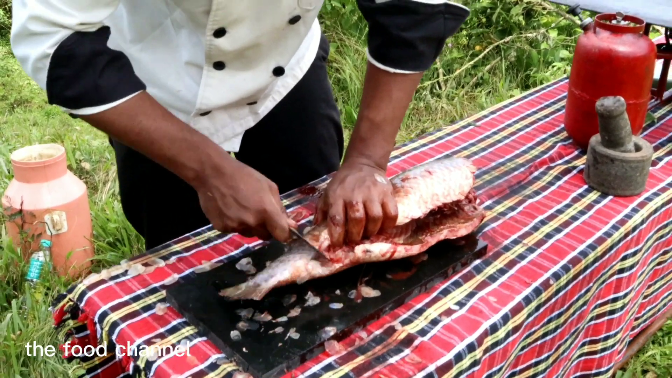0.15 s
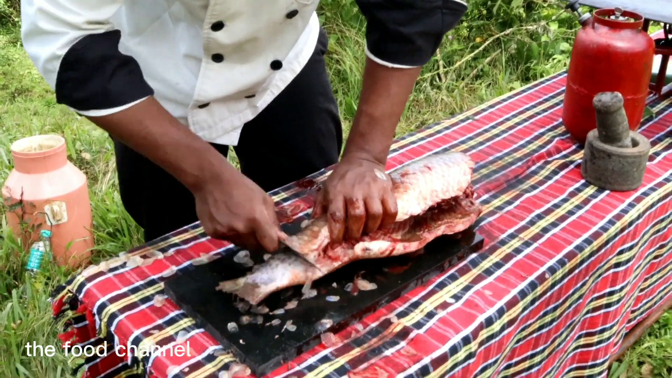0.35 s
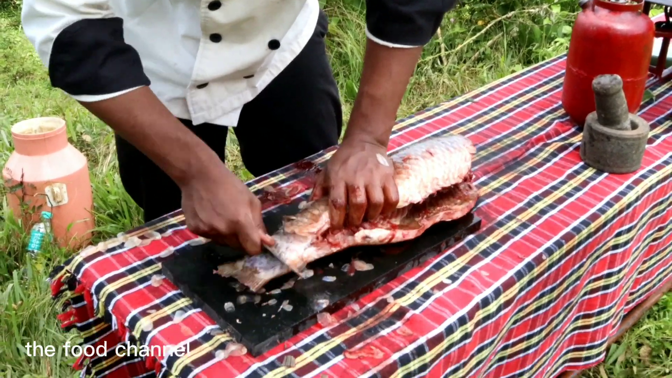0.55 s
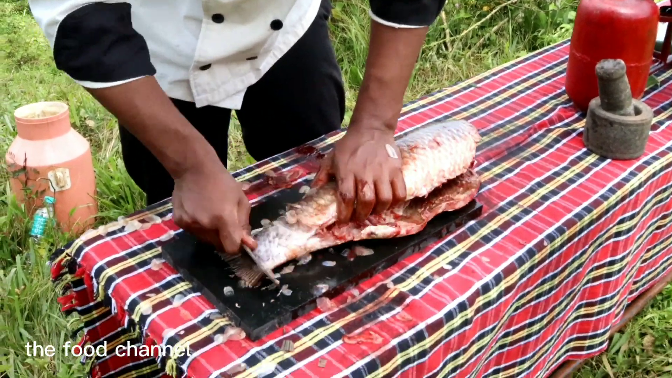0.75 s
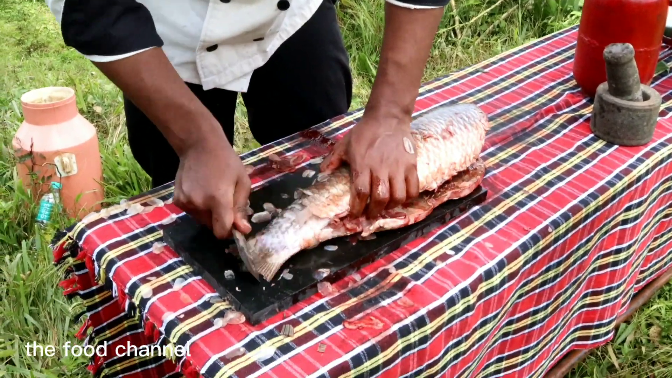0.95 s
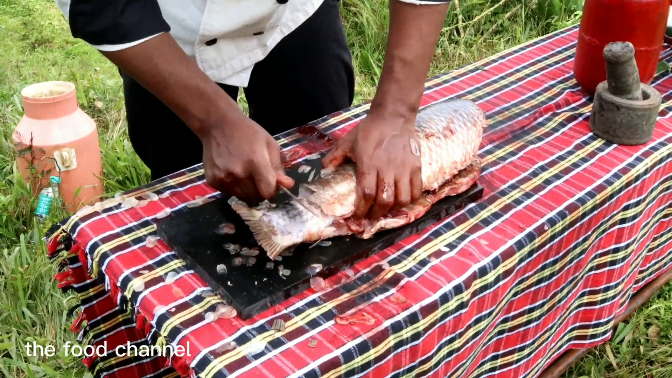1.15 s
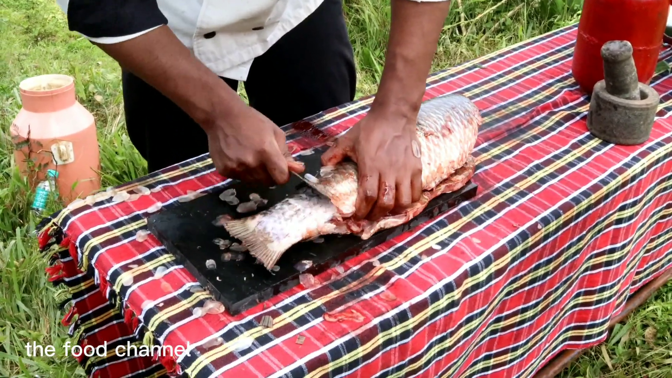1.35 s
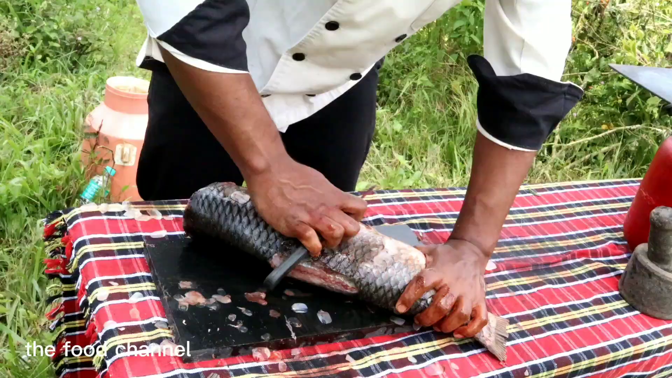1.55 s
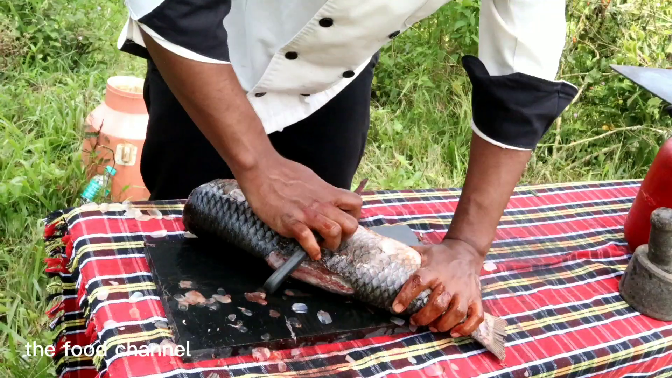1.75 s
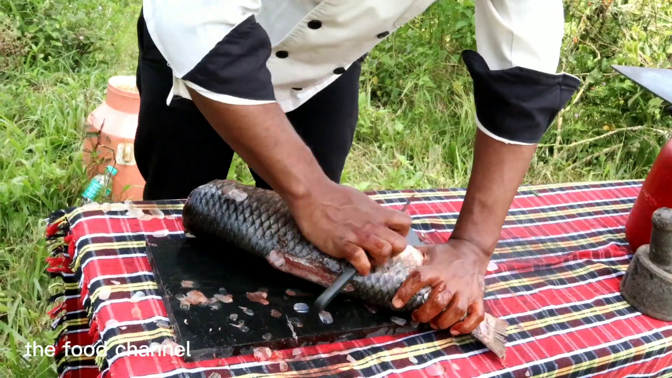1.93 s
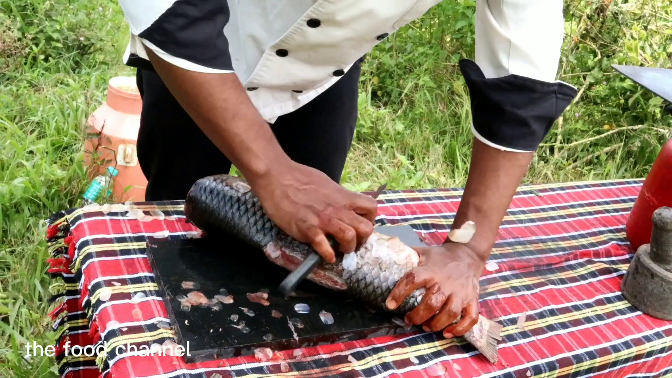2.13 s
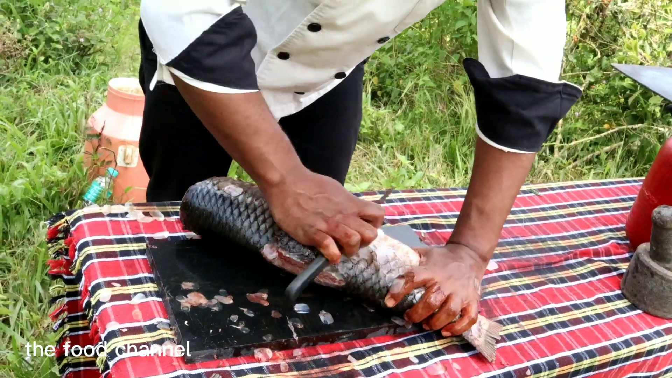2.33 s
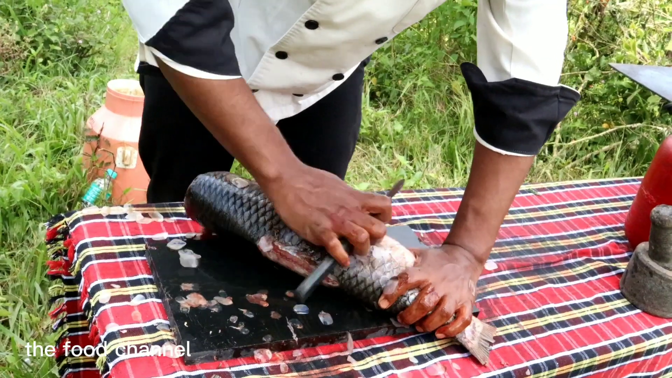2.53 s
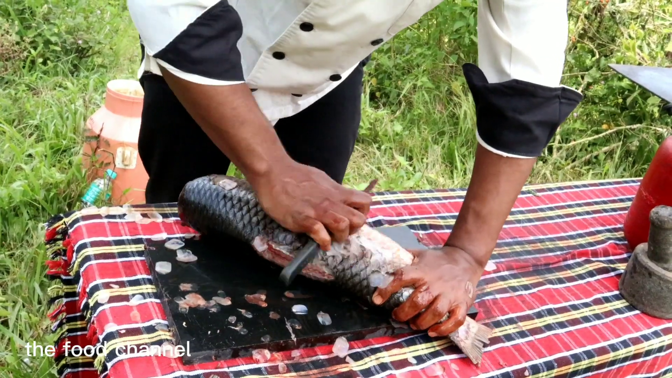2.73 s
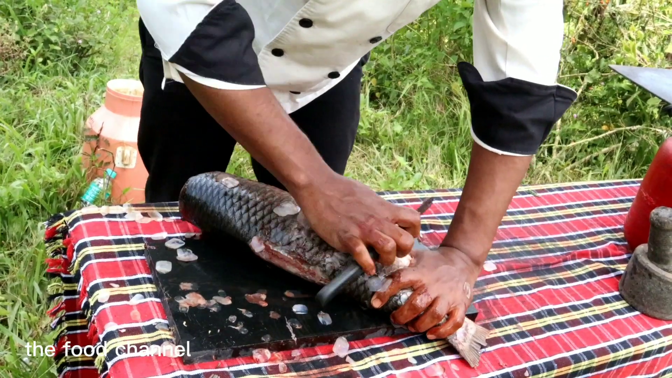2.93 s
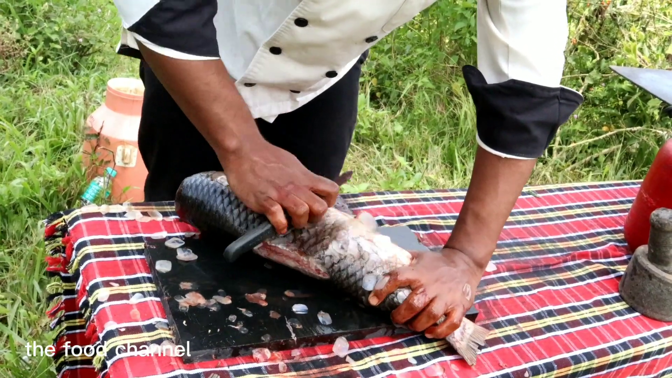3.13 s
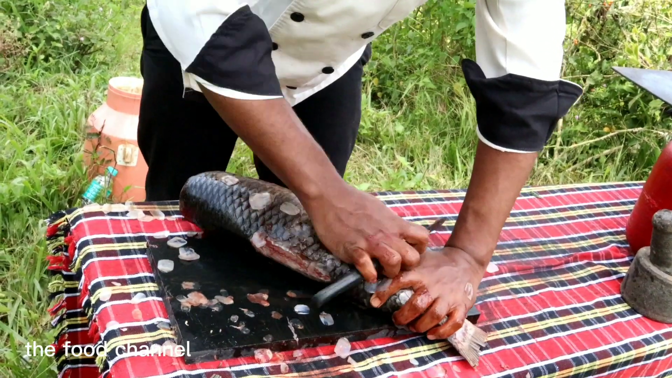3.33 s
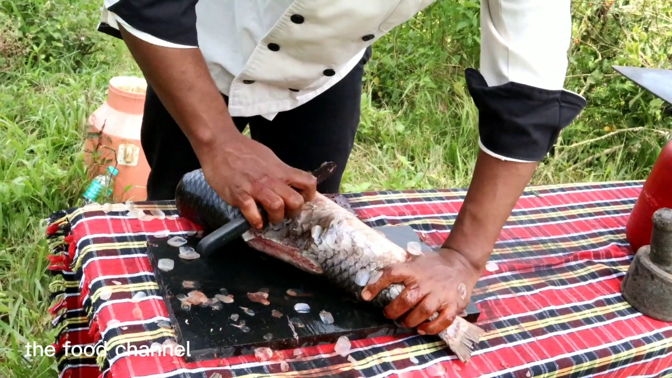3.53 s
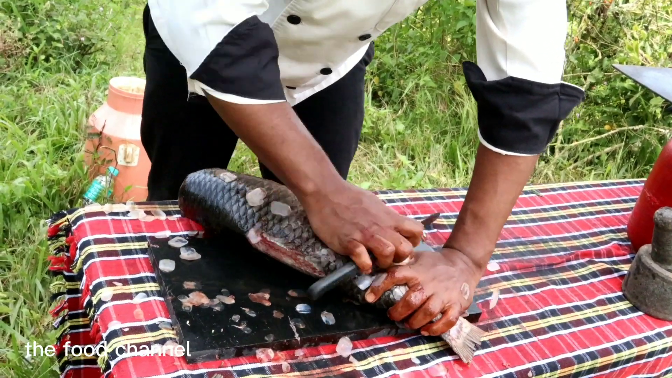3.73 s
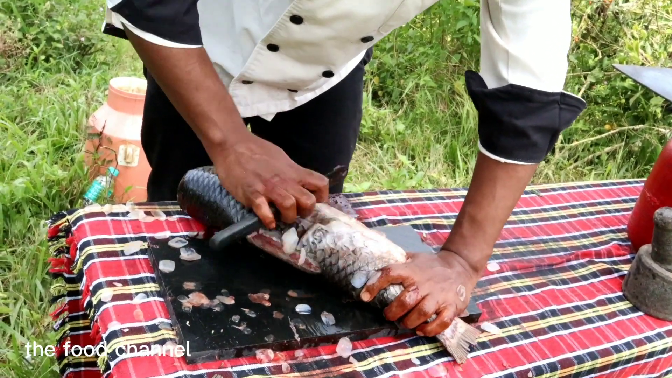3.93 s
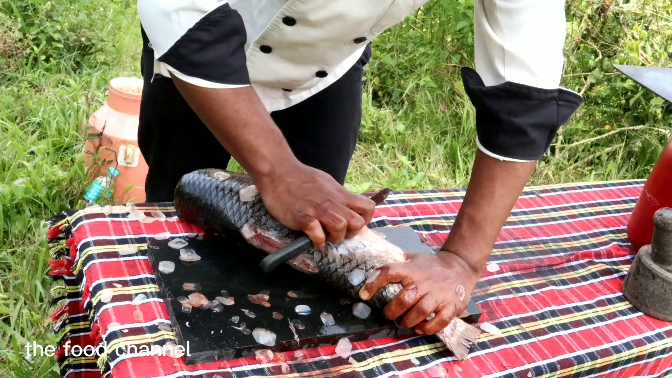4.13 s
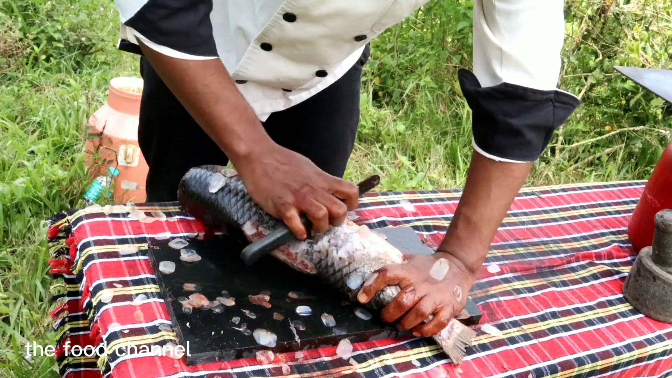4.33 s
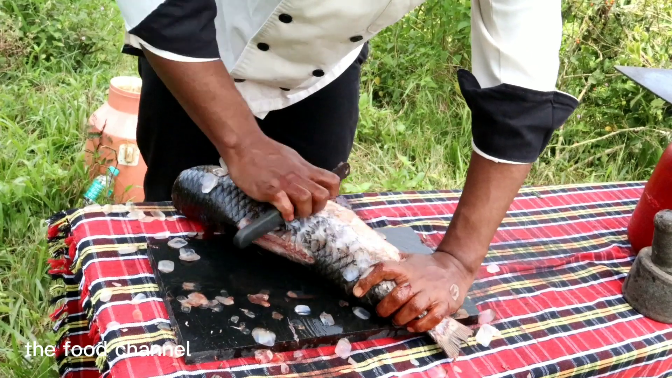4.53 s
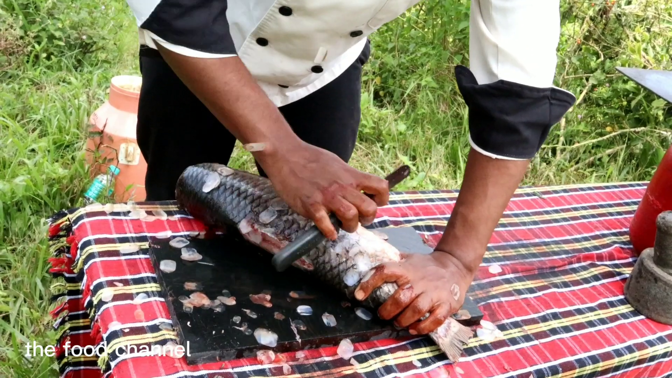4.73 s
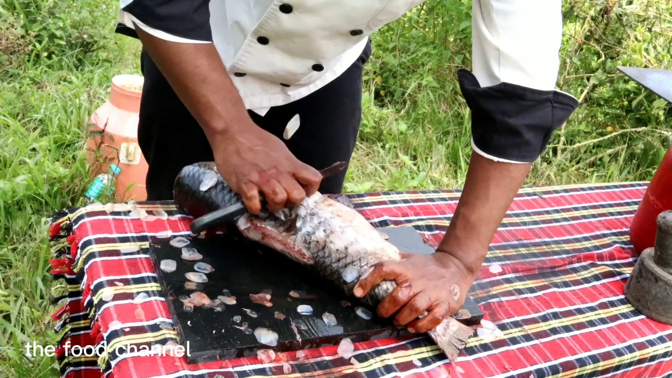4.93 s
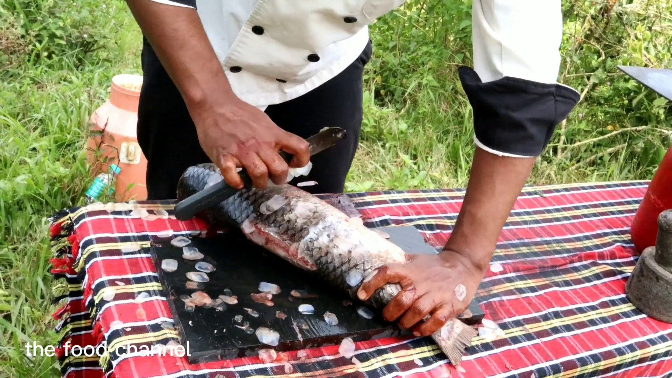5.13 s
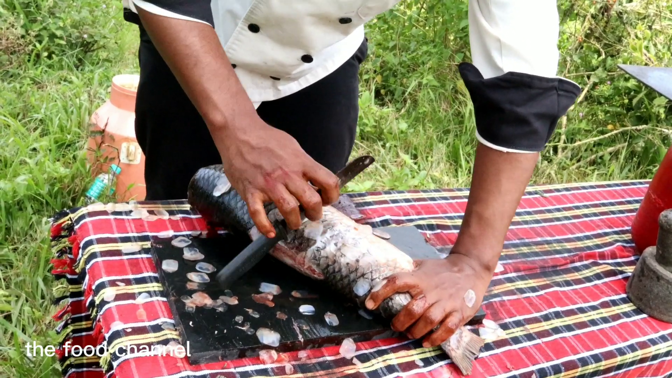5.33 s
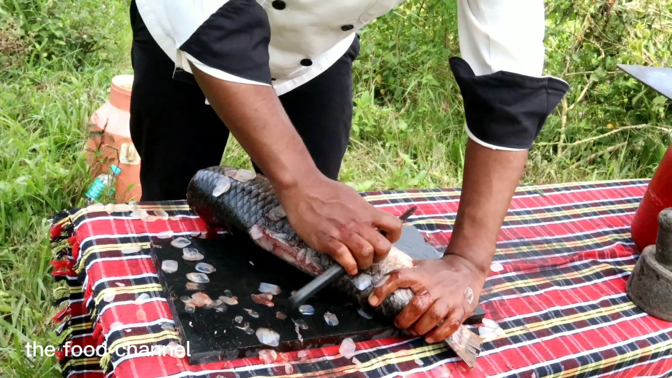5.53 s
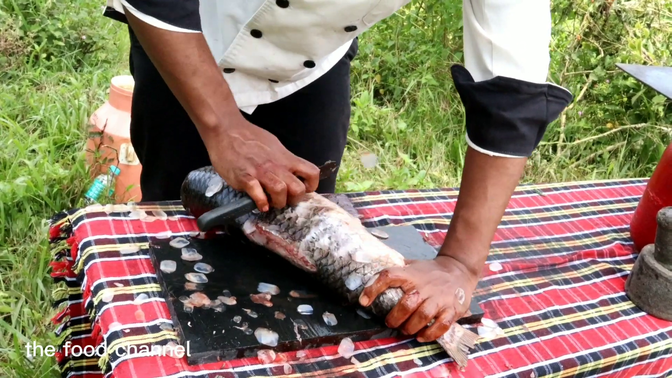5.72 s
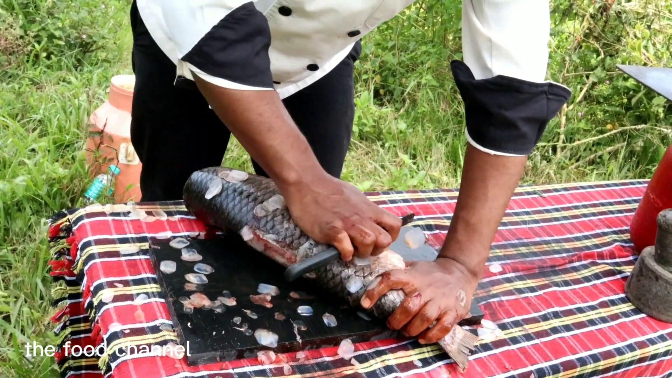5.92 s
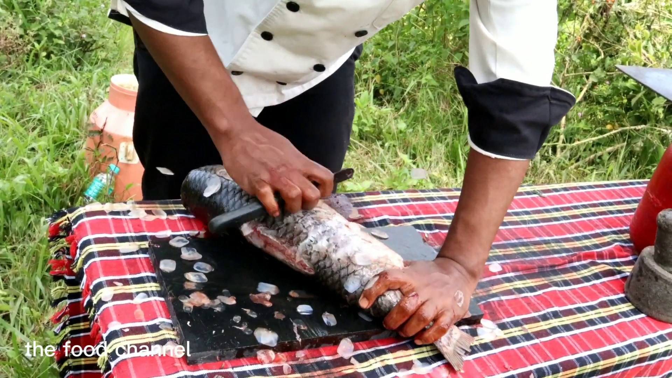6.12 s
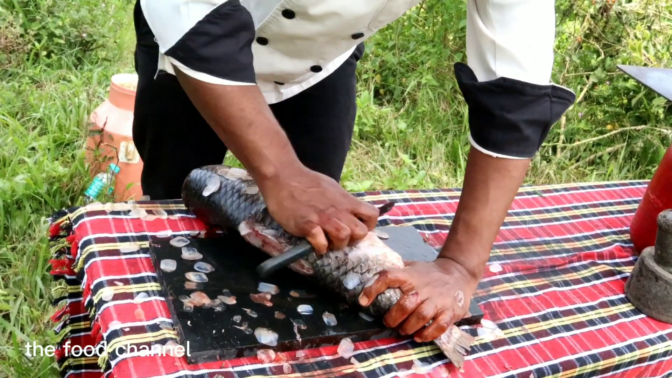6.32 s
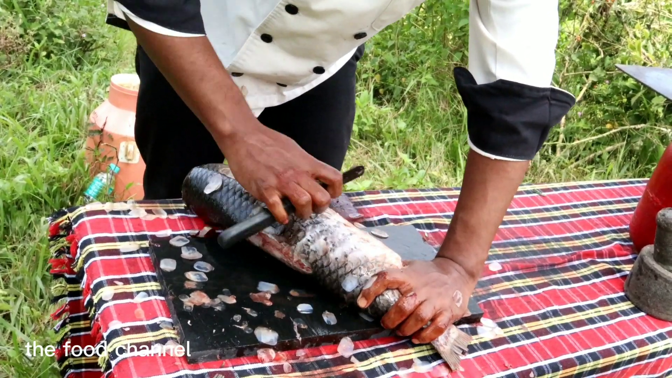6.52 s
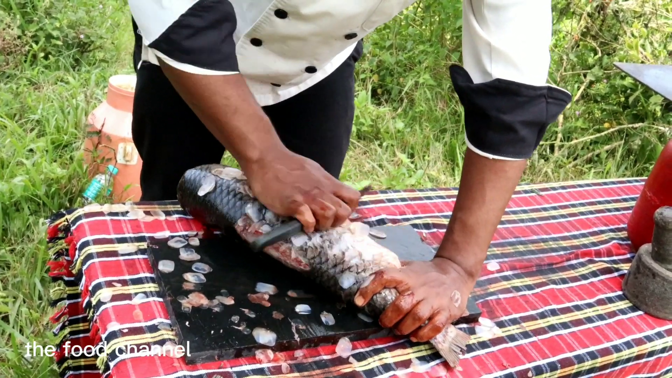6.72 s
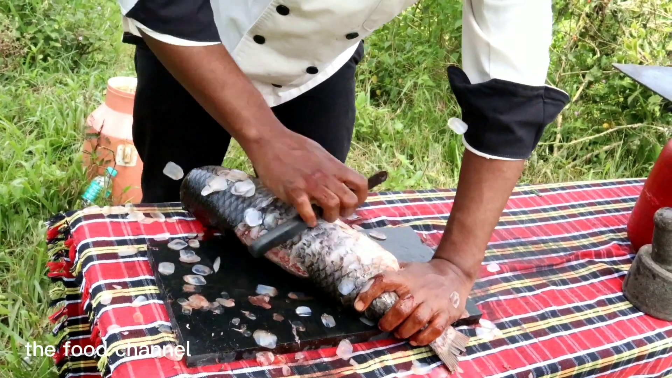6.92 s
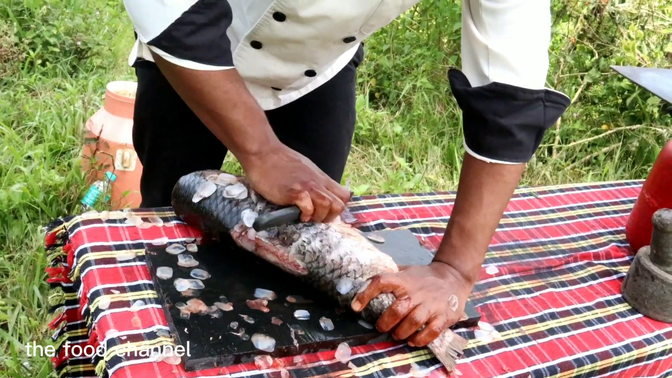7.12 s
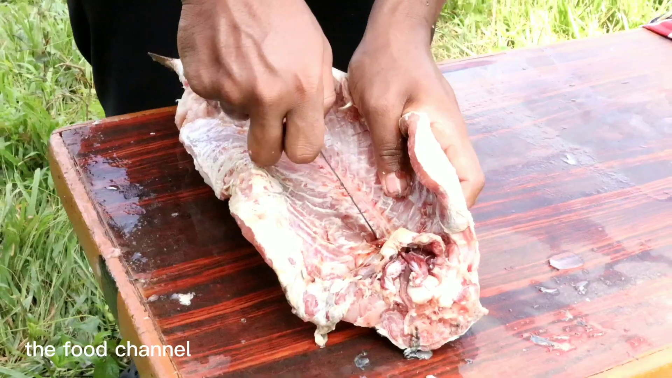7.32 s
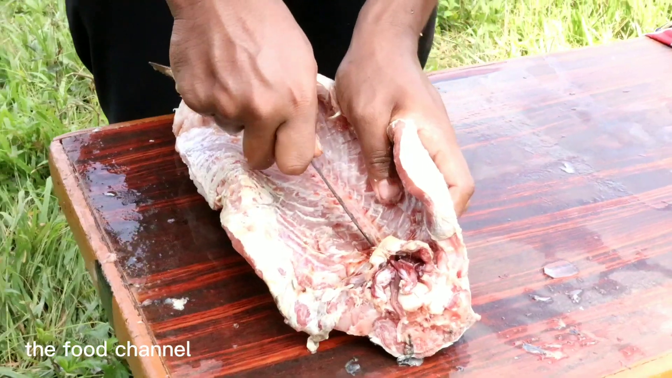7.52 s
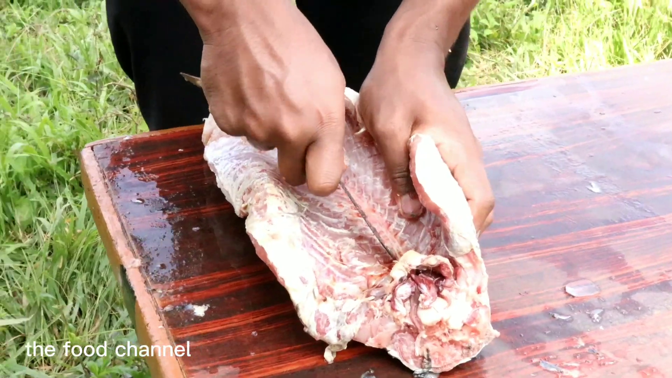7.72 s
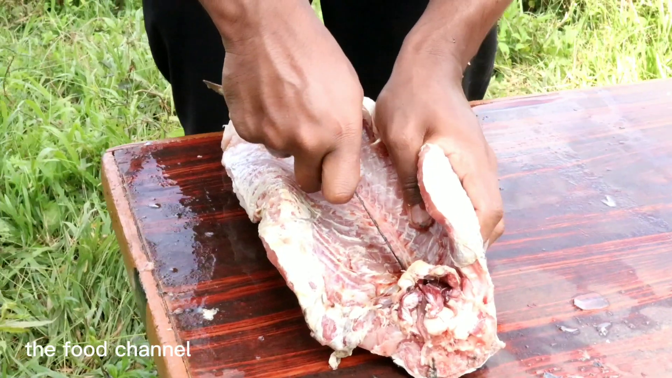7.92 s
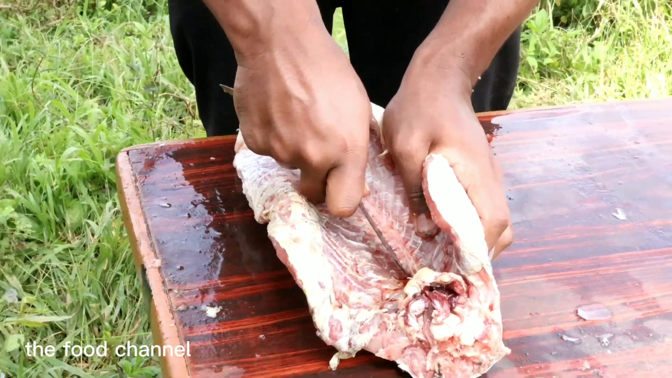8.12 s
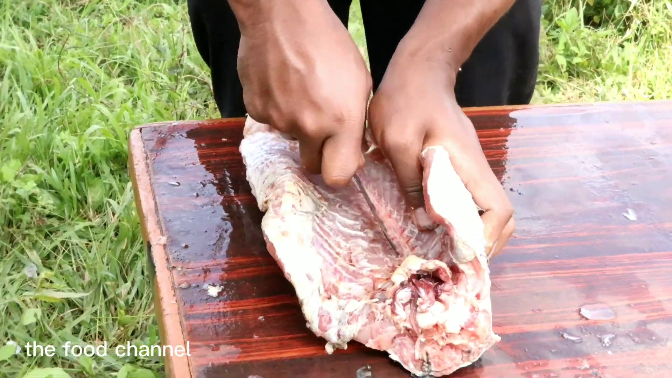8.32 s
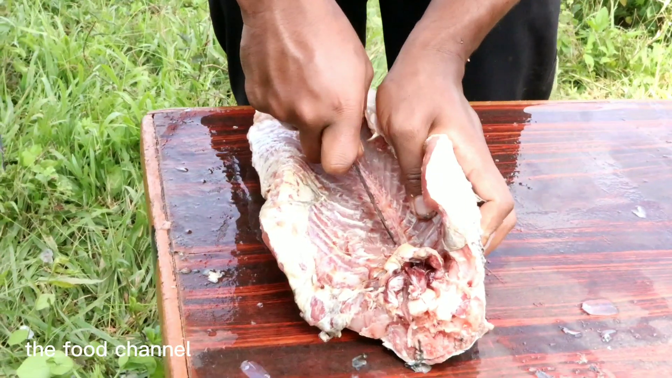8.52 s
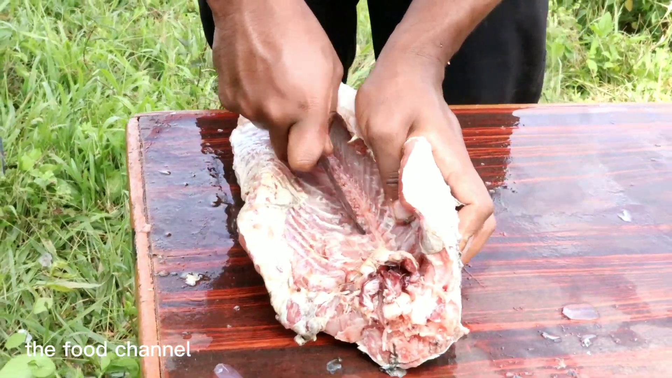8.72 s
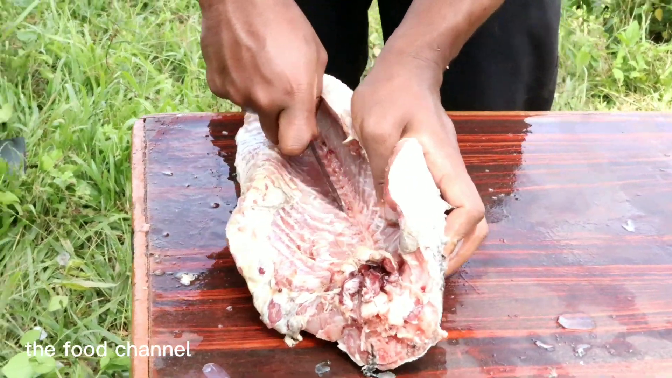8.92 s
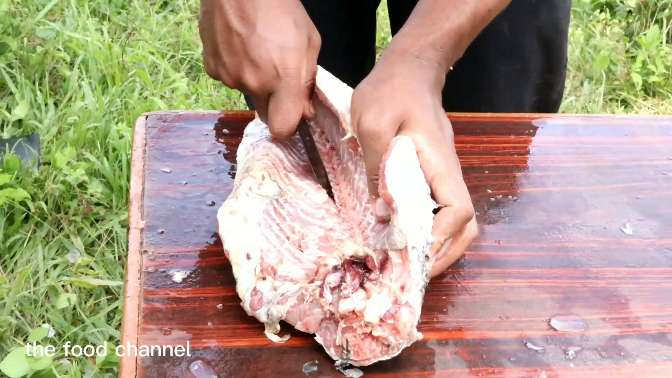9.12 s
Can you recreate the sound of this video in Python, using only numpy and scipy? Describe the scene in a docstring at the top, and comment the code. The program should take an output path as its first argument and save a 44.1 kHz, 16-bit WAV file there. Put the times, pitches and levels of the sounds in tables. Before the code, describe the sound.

Outdoors, heard closely over faint wide air. From 0 to 1.4 seconds a knife saws a large fish's tail with short, wet, gritty rasps, small cracks and low board rumble; a strong double knock lands near 1.1. After a brief pause, scaling begins at 1.6: bright, crackling strokes roughly every 0.4 seconds, slightly to the right, with hollow rising rings, snapping scales and finer hissing returns. The board rocks softly, more clearly between 4 and 5.2, and a very hard knock strikes at 5.5. Scraping continues to about 7.1, then stops. From 7.2 the air opens up, with low wind puffs, a faint wavering tone and a soft hiss swelling around 8.3. Light ticks and taps sound on a bare table; a deep thud hits at 8.4, then heavy thuds and bone crunches from 8.8 to the end near 9.15.

```python
"""A knife saws with short wet rasps at the tail of a large fish, on a table outdoors and close by.
It then rasps the scales off in quick strokes with lighter returns, while the cutting board rocks and knocks.
At the end the backbone is cut on the bare table, with crunches and deep thuds. Behind it are open air, a little
wind and a soft swell of hiss. Shaped noise makes the rasps, hisses and air; damped resonances make the hollow
rings, knocks and thuds."""
import sys
import numpy as np
from scipy import signal
from scipy.fft import rfft, irfft, next_fast_len
from scipy.io import wavfile
from scipy.ndimage import uniform_filter1d, map_coordinates

SR = 44100
rng = np.random.default_rng(int(sys.argv[2]) if len(sys.argv) > 2 else 0)


def master(y):
    """Save y as 16-bit WAV."""
    cut = np.clip(np.atleast_2d(y).T, -1, 1)
    pcm = np.round(cut * 32767)  # scale
    wavfile.write(sys.argv[1], SR, pcm.astype(np.int16))


N = 403956  # length in samples

# Levels in all tables are relative: the function that plays a layer may trim or vary them.
# Open air, strength at each pitch: (f/Hz, level/dB)
AIR_COLOUR = [(15, -30), (25, 1.5), (263, -5), (624, -12), (754, -10), (1020, -13.5), (1190, -12.5),
              (1370, -17), (1520, -12.5), (1790, -14.5), (2050, -15), (12200, -29.5), (16000, -46)]
# Open air, loudness over time: (t/s, level/dB)
AIR_LEVEL = [(0.0, -41.5), (2.6, -45), (7.14, -46), (7.3, -43.5), (7.86, -41), (8.27, -36.5), (9.16, -36)]
# Open air, likeness of left and right: (f/Hz, likeness 0 to 1)
AIR_ALIKE = [(100, 0.97), (250, 0.59), (500, 0), (1500, 0)]
# Swell of hiss, loudness over time: (t/s, level/dB)
SWELL_LEVEL = [(7.25, -71), (7.95, -41), (8.26, -36.5), (8.6, -48), (8.76, -38.5), (9.16, -73)]
# Swell of hiss, strength at each pitch: (f/Hz, level/dB)
SWELL_COLOUR = [(180, -13), (300, -4.5), (1750, -12.5), (2210, -7), (6200, -21), (8500, -18), (15000, -34),
                (16000, -55)]
# Bands that stand out in the swell: (f/Hz, width/Hz, level/dB)
SWELL_BANDS = [(1350, 120, 2), (2240, 140, -6), (3060, 190, 0), (3940, 130, 1), (5400, 300, 1),
               (8650, 240, -14)]
# Gusts that nudge the microphone: (t/s, hold/s, level/dB)
GUSTS = [(7.32, 0.023, -28), (7.445, 0.023, -25), (7.52, 0.099, -40), (7.695, 0.018, -32),
         (8.05, 0.012, -32), (8.26, 0.013, -25.5), (8.35, 0.037, -26.5)]
# Low buffeting of a gust: (f/Hz, level/dB)
GUST_COLOUR = [(20, 0), (42, -1), (70, 5.5), (130, -5), (300, -27), (1000, -90)]
# Near sounds, likeness of left and right: (f/Hz, likeness 0 to 1)
NEAR_ALIKE = [(150, .995), (500, .98), (1200, .87), (2400, .76), (4000, .54), (8000, .25), (15000, .1)]
# Sideways balance of the scaling knife: (f/Hz, left minus right level/dB)
LEFT_OVER_RIGHT = [(380, -0.7), (700, 1), (1290, -0.5), (2380, -7.5), (4400, -0.5), (8120, -3.5),
                   (15000, -2.5)]
# The board rocking back as the pressure eases: (t/s, peak level/dB)
ROCKS = [(2.976, -34), (3.711, -30.5), (4.066, -25.5), (4.445, -22), (4.828, -24), (5.186, -23),
         (5.913, -33), (6.283, -34.5), (6.634, -30), (7.076, -30), (8.637, -21.5), (9.122, -15.5)]
# Resonances of the rocking board: (f/Hz, width/Hz, level/dB)
ROCKING_MODES = [(164, 46, -20), (261, 81, 13.5), (450, 220, -2), (605, 100, 12), (830, 38, -32),
                 (867, 34, 7), (1020, 24, -13), (1300, 60, -14)]
# Hard knocks on the board: (t/s, peak level/dB, tick level/dB, rattle t60/s, contact hardness f/Hz)
BOARD_KNOCKS = [(0.809, -18, -3, 0.037, 1200), (1.0836, -1, 20.5, 0.031, 1300),
                (1.1022, -3, -14, 0.064, 1000), (1.352, -18, -8, 0.088, 900),
                (3.963, -13.5, -20, 0.027, 1000), (5.5003, 5, -22, 0.016, 3940),
                (5.5506, -6, -30, 0.04, 2070), (5.564, -11.5, -30, 0.068, 1870),
                (6.844, -19, -20, 0.031, 1300), (7.227, -23, -22, 0.038, 3000),
                (7.257, -39, -21, .03, 2200), (8.257, -19, -17, 0.021, 2600)]
# Resonances of the struck board: (f/Hz, width/Hz, level/dB)
BOARD_MODES = [(184, 14, -5.5), (392, 110, -2.5), (745, 215, -0.5), (1000, 150, -12), (1520, 77, -4.5),
               (1770, 150, -10), (1970, 80, -6), (2940, 140, -70)]
# Blows that reach the table top: (t/s, peak level/dB, clack level/dB, tick level/dB)
TABLE_THUDS = [(0.144, -27, -9, -8), (0.357, -22.5, -14, 7), (0.583, -22, -4, -7), (0.66, -23, -6, -12),
               (0.806, -21.5, 5.5, 15), (0.883, -18.5, -23, -4), (1.101, -29, 6.5, 19),
               (1.349, -15, -25, 10.5), (7.257, -25, 3, 1), (7.491, -25, 5.5, 11.5), (7.705, -29, 7, 7),
               (8.041, -29.5, -15, -12), (8.194, -27, -34, -11), (8.257, -18.5, 3, 4), (8.404, 1, -11, -3),
               (8.797, 0, -0.5, -2.5), (8.828, -3.5, -5.5, 3), (8.878, -15.5, -13, 14),
               (9.013, -18.5, -24, 20.5), (9.03, -15, 4, -14)]
# Resonances of the struck table, about which each blow varies: (f/Hz, level/dB, t60/s)
TABLE_MODES = [(97, -37, 0.84), (119.3, -27, 0.35), (173.3, -12.5, 0.13), (212.3, -1.5, 0.055),
               (249, -10, 0.079), (342, -4, 0.025)]
# The table under a steady shaking: (f/Hz, width/Hz, level/dB)
TABLE_LEGS = [(91.2, 19, 2), (153.6, 24, 6.5), (347, 33, 0)]
# The blade crunching through ribs: (t/s, hold/s, crunch level/dB, table rumble level/dB)
CUTS = [(8.851, 0.0029, -33.5, -16), (8.877, 0.012, -27.5, -25), (9.011, 0.055, -24, -15.5),
        (9.115, 0.033, -44, -30)]
# Crunch of bone: (f/Hz, level/dB)
BONE_COLOUR = [(180, -37), (300, -15), (398, -25), (994, -16.5), (1140, -13.5), (2520, -18), (3130, -3.5),
               (4830, -12.5), (9090, -13), (12700, -15.5), (16000, -35)]
# Wet squeaks as the blade shifts its place: (t/s, hold/s, level/dB, hollow f/Hz)
SQUEAKS = [(1.866, 0.0081, -34.5, 1740), (2.226, 0.012, -30.5, 1540), (3.315, 0.042, -38.5, 1650),
           (3.81, 0.015, -42.5, 1710), (4.404, .01, -45, 1630), (5.887, 0.0057, -20.5, 1740),
           (5.967, 0.0049, -48, 1950), (6.239, 0.0032, -35.5, 1520)]
# The biggest scales and bones snapping:
# (t/s, crack level/dB, clack level/dB, hollow pock level/dB, crack t60/s before its limits)
SNAPS = [(0.0278, -6, -29, -30, 0.015), (0.0412, -4, -20, -28, 0.0097), (0.1486, -8, -29, -20, 0.013),
         (0.2157, -7, -24, -34, 0.013), (0.2383, -5, -29, -22, 0.013), (0.3576, -1.5, -31, -23, 0.013),
         (0.4318, -2.5, -28, -23, 0.013), (0.5154, -14, -22, -25.5, 0.0092), (0.5881, -9, -21, -17, 0.012),
         (0.6887, -7, -13, -24, 0.015), (0.8059, -1.5, -26, -16, 0.013), (1.1228, -2, -35, -23, 0.028),
         (1.161, -7, -30, -41, 0.019), (1.3488, -5, -34, -28, 0.013), (1.4024, -3.5, -33, -22, 0.028),
         (1.6412, -5.5, -11, -12, 0.019), (1.6656, -4.5, -1.5, -15, 0.033), (1.6854, -7, 0, -13.5, 0.013),
         (1.7164, -29, -6, -6, 0.013), (1.7509, -19, -30, -7.5, 0.014), (1.9609, -13, -13, -36, 0.027),
         (2.0363, 0, -8, -7, 0.028), (2.0514, -10, -4, -10, 0.012), (2.0707, -23, 0, -30, 0.013),
         (2.1164, -3, -0.5, -21, 0.036), (2.417, -2.5, -18, -20, 0.016), (2.4575, 1.5, -4, -10.5, 0.016),
         (2.4898, -8, -1, -10, 0.014), (2.4982, -2, -21, -18, 0.019), (2.8082, -13, 5, -18, 0.013),
         (2.824, -2, -8, -18, 0.012), (2.8664, -20, -12, -36, 0.013), (2.8927, -9, -21, -10, 0.016),
         (2.9937, -9, -8.5, -34, 0.025), (3.166, -4, -20, -38, 0.029), (3.2074, -5, -14, -19, 0.014),
         (3.2334, -3, -4, -14, 0.019), (3.265, -12, -23, -14, 0.013), (3.5423, -6, -0.5, -26, 0.016),
         (3.599, 0, -2, -7.5, 0.039), (3.908, -3, -30, -22, 0.013), (3.9634, -17, -12, -11, 0.016),
         (4.2572, -5.5, -26, -22, 0.019), (4.3067, -7.5, 3, -6, 0.013), (4.6016, -15, -25, -17, 0.013),
         (4.6744, -3, 1.5, -7, 0.013), (4.825, -19.5, -49, -52, 0.021), (4.8358, -18, -46, -49, 0.028),
         (4.9867, -5, -33, -32, 0.017), (5.0365, -11, -10, -21, 0.013), (5.1694, -7.5, -34, -37, 0.0087),
         (5.7013, -11.5, -38, -47, 0.013), (5.7527, -6.5, -18, -23, 0.019), (5.7943, -9, -9.5, -14, 0.024),
         (6.0593, -7.5, -27, -30, 0.013), (6.103, -23, -6, -20, 0.013), (6.1669, -5, -22, -19, 0.019),
         (6.4224, 1, -29, -12, 0.027), (6.5098, -5, 1, -15, 0.017), (6.5308, 6.5, -13, -12.5, 0.012),
         (6.7427, -16, -33, -33, 0.038), (6.8239, 0, -31, -34, 0.019), (6.8446, -22, -24, -7.5, 0.014),
         (6.8903, -8, 1, -13, 0.013), (6.9203, -6, -21, -18, 0.016), (8.8518, -10, -16, -15, 0.013),
         (8.8833, 0.5, -27, -14, 0.021), (9.0087, -9, -15, -26, 0.013), (9.0196, -2, 4, -21, 0.011),
         (9.0375, -10, 2, -21, 0.013), (9.043, -12, -13, -16, 0.013), (9.0564, -10, -12, -31, 0.013),
         (9.0654, -2, -14, -14, 0.013)]
# Pushes and pulls of the blade through the tail: (t/s, hold/s, rasp level/dB, board rumble level/dB)
SAWING = [(0.003, 0.034, -23, -31.5), (0.144, 0.028, -25, -27), (0.213, 0.037, -24, -40),
          (0.349, 0.034, -27, -29.0), (0.416, 0.048, -23.5, -35.5), (0.58, 0.024, -26.5, -32.5),
          (0.653, 0.037, -26, -35), (0.8, 0.041, -31.5, -28), (0.871, 0.052, -27, -41),
          (1.059, 0.0037, -23.5, -24.5), (1.12, 0.046, -27, -35), (1.307, 0.0056, -33.5, -32.5),
          (1.355, 0.084, -29.5, -35.5)]
# Rasp of the sawing: (f/Hz, level/dB)
SAW_COLOUR = [(180, -30), (300, -19), (528, -8), (787, -0.5), (900, -5.5), (1720, -6), (1900, 1),
              (2280, -4), (2790, -1), (4090, -2.5), (10700, -0.5), (11700, 0.5), (16000, -38)]
# Rumble under the sawing: (f/Hz, level/dB)
SAW_RUMBLE = [(50, -21), (100, -3.5), (165, -0.5), (240, -3), (340, -7.5), (500, -11), (780, -8),
              (1100, -32), (2000, -80)]
# The blade sliding back along the scales: (t/s, hold/s, hiss level/dB, hollow ring level/dB, hollow f/Hz)
RETURNS = [(1.869, 0.044, -37.5, -46.5, 1690), (1.968, 0.0025, -36, -42, 1790),
           (2.255, 0.044, -25, -38, 1770), (2.309, 0.037, -32, -40, 1750),
           (2.621, 0.042, -26.5, -47, 1770.0), (2.714, 0.0084, -19.5, -26.5, 1670.0),
           (2.995, 0.027, -26.5, -39.5, 1690.0), (3.103, 0.0045, -30, -31.5, 1720),
           (3.365, 0.025, -24.5, -46, 1690.0), (3.721, 0.031, -22, -35.0, 1680),
           (4.069, 0.053, -24, -34.5, 1670), (4.173, 0.011, -31.5, -33, 1570),
           (4.429, 0.035, -30.0, -45, 1590.0), (4.744, 0.06, -48.5, -57, 1710.0),
           (5.177, 0.0066, -42, -39, 2180), (5.903, 0.013, -30.5, -53, 1820.0),
           (6.247, 0.026, -40, -62, 1530.0), (6.603, 0.034, -49, -53, 1630),
           (7.174, 0.003, -31.5, -42.5, 1620)]
# Hiss of the sliding blade: (f/Hz, level/dB)
SLIDE_COLOUR = [(290, -55), (500, -24), (688, -21), (1360, -28), (1600, -48), (2190, -14), (3200, -1),
                (4280, -12), (6330, 0.5), (9630, -2.5), (10800, 2.5), (14500, -21.5), (16000, -37)]
# Strokes against the scales: (t/s, hold/s, fizz level/dB, coarse rasp level/dB, board rumble level/dB,
# hollow ring level/dB, hollow f/Hz)
SCALING = [(1.63, 0.12, -30, -32, -36.5, -28, 1590), (2.042, 0.097, -26.5, -27.5, -39.5, -25.5, 1540),
           (2.414, 0.11, -25, -26.5, -38.5, -28, 1590), (2.786, 0.12, -26.5, -25.5, -37.5, -29.0, 1560),
           (3.154, 0.103, -26, -24, -31.5, -32.5, 1520.0), (3.518, 0.11, -25, -28.5, -35, -28.5, 1585),
           (3.889, 0.11, -23.5, -26, -38.5, -29, 1540), (4.24, 0.087, -24, -25.5, -35.0, -28, 1560),
           (4.581, 0.11, -26, -29.5, -36.5, -32.5, 1535), (4.952, 0.13, -29, -30.0, -38.5, -34, 1600),
           (5.658, 0.14, -28.5, -30.5, -40, -37, 1610), (6.072, 0.093, -25.5, -24.5, -30.5, -30, 1546),
           (6.426, 0.1, -23, -23, -37, -29.5, 1600), (6.805, 0.1, -23.0, -25, -36.5, -31.5, 1530)]
# Crackle of the scales: (f/Hz, level/dB)
SCALE_COLOUR = [(180, -49), (300, -11.5), (519, -28), (678, -10.5), (1230, -14), (1530, -15.5), (1970, -13),
                (3080, -5.5), (4750, -9.5), (6410, -1.5), (9090, -6), (10700, -2.5), (11900, -9),
                (14500, -24), (16000, -44)]
# Rumble under the scaling: (f/Hz, level/dB)
SCALE_RUMBLE = [(29, -43), (50, -22), (92, 5), (163, -10), (205, -1), (265, -6), (327, -11.5), (426, -16.5),
                (600, -8.5), (700, -9), (910, -9), (1540, -120)]

FAR_TONE_HZ, FAR_TONE_TOP_DB = 658, -52.5  # its level wavers downwards from here
AIR_WAVER_DB = 1.5
FIZZ_FROM_HZ = 5070  # where the coarse rasp gives way to the fizz
TOP_HZ = 16000  # upper limit of the sound


def amp(db):
    """Decibels to gain."""
    return 10 ** (np.asarray(db) / 20)


def unit(x):
    """Scale to rms 1."""
    return x / np.sqrt(np.mean(x ** 2) + 1e-20)


def crest(x):
    """Scale to peak 1."""
    return x / (np.abs(x).max() + 1e-20)


def along(points, hz):
    """Read a curve of (f/Hz, value) points on a log axis."""
    f, v = np.transpose(points)
    return np.interp(np.log(hz + 1), np.log(f + 1), v)


def level(points):
    """One gain per sample from (t/s, level/dB) points."""
    return amp(np.interp(np.arange(N) / SR, *np.transpose(points)))


def wobble(rate):
    """A smooth random curve with `rate` random points a second."""
    knots = rng.standard_normal(int(N * rate / SR) + 4)
    return map_coordinates(knots, [np.arange(N) * rate / SR])


def filtered(x, response):
    """Multiply the spectrum of x by a response of frequency."""
    n = x.shape[-1]
    m = next_fast_len(n + 4096)  # spare room for the tail of the filter
    return irfft(rfft(x, m) * response(np.fft.rfftfreq(m, 1 / SR)), m)[..., :n]


def coloured(x, spectrum):
    """Shape x by (f/Hz, level/dB) points."""
    return filtered(x, lambda hz: amp(along(spectrum, hz)))


def resonance(hz, centre_hz, width_hz):
    """Response of one damped resonance."""
    return 1j * hz * width_hz / (centre_hz ** 2 - hz ** 2 + 1j * hz * width_hz)


def body(hz, modes):
    """Summed response of (f/Hz, width/Hz, level/dB) resonances."""
    return sum(amp(db) * resonance(hz, centre, width) for centre, width, db in modes)


def pair(n, alike=NEAR_ALIKE):
    """White stereo noise, more alike in the bass than in the treble."""
    def mid_and_side(hz):
        turn = np.arccos(np.clip(along(alike, hz), -1, 1)) / 2
        return np.array([np.cos(turn), np.sin(turn)])
    mid, side = filtered(rng.standard_normal((2, n)), mid_and_side)
    return np.array([mid + side, mid - side])


def add(track, s, sound):
    """Mix a sound in at s seconds."""
    start = max(round(s * SR), 0)
    part = track[:, start:start + sound.shape[-1]]
    part += sound[..., :part.shape[-1]]


def presses(rows, order, attack_s, release_s, lag_s=0, growth_db_per_s=0):
    """Each stroke rises, holds near the level in column `order` and falls; attack and release span 60 dB."""
    t, total = np.arange(N) / SR - lag_s, np.zeros(N)
    for row in rows:
        s, hold = row[:2]
        near = slice(*np.searchsorted(t, [s - attack_s, s + hold + release_s]))
        u = t[near] - s
        edges = np.maximum(-u, 0) / attack_s + np.maximum(u - hold, 0) / release_s
        growth_db = growth_db_per_s * (np.clip(u, 0, hold) - hold / 2)
        total[near] += amp(row[order] + growth_db - 60 * edges)
    return total


def catches(rate, spread_db, life, rub, clump_db):
    """An edge catches and slips: random flicks in loose bunches over steady rubbing; rate per s, life in s."""
    size = amp(spread_db * np.clip(rng.standard_normal(N), -2, 2))
    happens = rng.random(N) < rate / SR
    energy = signal.lfilter([1], [1, -np.exp(-1 / (life * SR))], (size * happens) ** 2)
    return unit(np.sqrt(energy / energy.mean() + rub) * amp(clump_db * wobble(90)))


def shifting(x, depth_db):
    """The colour shifts at random, in patches about 800 Hz by 30 ms."""
    z = signal.stft(x, nperseg=256)[2]
    field = rng.standard_normal(z.shape[1:])
    for _ in range(2):
        field = uniform_filter1d(field, size=4, axis=0)
        field = uniform_filter1d(field, size=9, axis=1)
    return unit(signal.istft(z * amp(depth_db * unit(field)), nperseg=256)[1][:, :N])


def hollow(flicks, strokes, width_hz, rise_hz_per_s):
    """The pocket between hand, blade and fish rings in broken spurts, rising in pitch along each stroke."""
    glides = []
    for s, hold, *_, hz in strokes:
        for part in (0, 1):  # start and end of the stroke
            glides.append((s + part * hold, hz + rise_hz_per_s * (part - .5) * hold))
    pitch_hz = np.interp(np.arange(N) / SR, *np.transpose(sorted(glides))) * (1 + 0.034 * wobble(35))
    turn = np.exp(2j * np.pi * np.cumsum(pitch_hz) / SR)
    drive = pair(N) * flicks * amp(3.9 * wobble(70))

    def mode(spin, width):
        # bring the moving pitch down to 0 Hz, smooth there, then bring it back
        smooth = signal.lfilter(*signal.butter(2, width / 2, fs=SR), drive / spin)
        return unit((smooth * spin).real)
    return mode(turn, width_hz) + amp(-5.5) * mode(turn ** 2, 2 * width_hz)  # the second is an octave up


def rumble(flicks, spectrum):
    """The flicks pass through the flesh and shake board and table."""
    return unit(filtered(pair(N) * flicks, lambda hz: amp(along(spectrum, hz)) * (1 + body(hz, TABLE_LEGS))))


def ring(modes, t, scatter_db):
    """Struck resonances die away, with new strengths and slightly new pitches for each blow."""
    hz, db, t60 = np.transpose(modes)[:, :, None]
    luck, detune = rng.standard_normal((2, len(modes), 1))
    fading = amp(db + scatter_db * luck - 60 * t / t60)
    return crest(np.sum(fading * np.sin(2 * np.pi * hz * (1 + 0.027 * detune) * t), axis=0))


def burst(t, t60, spectrum):
    """A short stereo crack of peak 1, made of fading noise."""
    return crest(coloured(pair(len(t)) * amp(-60 * t / t60), spectrum))


def tap(t, t60, centre_hz, width_hz):
    """A short fading noise of peak 1 through one resonance, passed twice."""
    return crest(filtered(pair(len(t)) * amp(-60 * t / t60),
                          lambda hz: resonance(hz, centre_hz, width_hz) ** 2))


def open_air():
    """Open air is wide, gently wavering noise."""
    return level(AIR_LEVEL) * amp(AIR_WAVER_DB * wobble(7)) * unit(coloured(pair(N, AIR_ALIKE), AIR_COLOUR))


def swell():
    """A soft hiss with stronger bands swells and fades."""
    banded = filtered(rng.standard_normal((2, N)),
                      lambda hz: amp(along(SWELL_COLOUR, hz)) * (1 + body(hz, SWELL_BANDS)))
    return level(SWELL_LEVEL) * amp(3.5 + 0.26 * wobble(14)) * unit(banded)


def far_tone():
    """A faint wavering tone: noise through a narrow resonance."""
    waver = amp(FAR_TONE_TOP_DB - 3.2 * np.abs(wobble(5)))
    return waver * unit(filtered(rng.standard_normal(N), lambda hz: resonance(hz, FAR_TONE_HZ, 60) ** 2))


def wind():
    """Gusts nudge the microphone with low, short puffs of noise."""
    gusts = presses(GUSTS, order=2, attack_s=0.066, release_s=0.083)
    return gusts * amp(-3.0) * unit(coloured(pair(N), GUST_COLOUR))


def outdoors():
    """Air throughout, and gusts of wind; the hiss and far tone join for the last part."""
    late = np.arange(N) / SR > 7.21
    return open_air() + late * (swell() + far_tone()) + wind()


def handling():
    """Wet fingers shift and loose scales patter on the board, up to the last part."""
    working = np.arange(N) / SR < 7.19
    patter = catches(rate=140, spread_db=12, life=0.0012, rub=0.074, clump_db=0.5)
    rustle = shifting(coloured(pair(N) * patter, SLIDE_COLOUR), depth_db=3.5)
    return amp(-53) * working * rustle


def rocks():
    """The board settles on the cloth with a soft, rounded bump."""
    out, t = np.zeros((2, N)), np.arange(SR // 4) / SR
    for s, db in ROCKS:
        force = pair(len(t)) * (1 - np.exp(-t / 0.0018)) * amp(-60 * t / 0.16)
        bump = filtered(force, lambda hz: body(hz, ROCKING_MODES) / (1 + 1j * hz / 1100) ** 2)
        add(out, s, amp(db + 1.5) * crest(bump))
    return out


def board_knocks():
    """Dry blows on the board, damped by the fish: a contact, a brief rattle and the tick of the blade."""
    out, t = np.zeros((2, N)), np.arange(SR // 5) / SR
    for s, db, tick_db, t60, hard_hz in BOARD_KNOCKS:
        contact = t == 0
        force = contact + 0.11 * pair(len(t)) * amp(-60 * t / t60)
        # a harder contact lets more treble through
        knock = crest(filtered(force, lambda hz: body(hz, BOARD_MODES) / (1 + 1j * hz / hard_hz) ** 2))
        tick = amp(tick_db - 19.5) * burst(t, t60=0.0099, spectrum=SAW_COLOUR)  # the steel edge itself
        add(out, s, amp(db - 0.5) * (knock + tick))
    return out


def table_thuds():
    """The knife breaks through with a tick and a clack; the table top answers with a rounded thud."""
    out, t = np.zeros((2, N)), np.arange(SR // 4) / SR
    clack_colour = [(150, 2), (400, -21.5), (750, 4.0), (1500, -5.5), (3000, -9), (9000, -59)]  # (f/Hz, level/dB)
    for s, db, clack_db, tick_db in TABLE_THUDS:
        blow = ring(TABLE_MODES, t, scatter_db=5.5) * (1 - np.exp(-t / 0.0014))
        thud = crest(filtered(blow, lambda hz: (1j * hz / (1j * hz + 35)) ** 2))  # drops the deepest bass
        clack = amp(clack_db) * burst(t, t60=0.026, spectrum=clack_colour)
        tick = amp(tick_db - 3) * burst(t, t60=0.027, spectrum=BONE_COLOUR)
        add(out, s, amp(db) * (thud + clack + tick))
    return out


def cuts():
    """Ribs give way in coarse crunches that shake the table."""
    crunch = presses(CUTS, order=2, attack_s=0.013, release_s=0.092)
    shake = presses(CUTS, order=3, attack_s=0.1, release_s=0.11, lag_s=0.0036, growth_db_per_s=139)
    flicks = catches(rate=700, spread_db=6.0, life=0.00095, rub=0.098, clump_db=2.0)
    rattle = unit(filtered(pair(N) * flicks, lambda hz: resonance(hz, 114, 58) ** 2
                           + amp(-4.5) * resonance(hz, 192, 170) ** 2))
    bone = shifting(coloured(pair(N) * flicks, BONE_COLOUR), depth_db=3.0)
    return amp(5.0) * crunch * bone + amp(-3.0) * shake * rattle


def squeaks():
    """Wet skin rubs and sounds the hollow alone."""
    rubbing = catches(rate=1100, spread_db=4, life=0.0012, rub=0.5, clump_db=1.5)
    pocket = hollow(rubbing, SQUEAKS, width_hz=490, rise_hz_per_s=3000)
    return presses(SQUEAKS, order=2, attack_s=.06, release_s=.035) * pocket


def snaps():
    """A big scale or bone lets go: a bright crack, a clack and a hollow pock sound together."""
    out, t = np.zeros((2, N)), np.arange(SR // 20) / SR
    for s, crack_db, clack_db, pock_db, t60 in SNAPS:
        # clack and pock get new pitches each time
        spread = np.array([.05, .13]) * rng.standard_normal(2)
        hollow_hz, scale_hz = np.array([1550, 3200]) * np.exp(spread)
        crack = burst(t, t60=np.clip(t60, .004, .03), spectrum=SLIDE_COLOUR)
        clack = tap(t, t60=.011, centre_hz=scale_hz, width_hz=1300)
        pock = tap(t, t60=0.01, centre_hz=hollow_hz, width_hz=860)
        add(out, s, amp(crack_db) * crack + amp(clack_db - 4.0) * clack + amp(pock_db + 0.5) * pock)
    return out


def sawing():
    """Short wet cuts through the skin and fin of the tail; the board answers a moment later."""
    rasp = presses(SAWING, order=2, attack_s=.035, release_s=.1, growth_db_per_s=20)
    shake = presses(SAWING, order=3, attack_s=0.046, release_s=0.17, lag_s=0.0066)
    flicks = catches(rate=900, spread_db=5.0, life=0.0012, rub=0.22, clump_db=2)
    cut = shifting(coloured(pair(N) * flicks, SAW_COLOUR), depth_db=2.5)
    return amp(1.5) * rasp * cut + amp(-1.5) * shake * rumble(flicks, SAW_RUMBLE)


def returns():
    """Sliding with the lie of the scales gives a finer, smoother hiss."""
    hiss = presses(RETURNS, order=2, attack_s=.045, release_s=.07)
    ringing = presses(RETURNS, order=3, attack_s=0.061, release_s=0.026, lag_s=-0.0027, growth_db_per_s=-120)
    flicks = catches(rate=1100, spread_db=5, life=0.001, rub=0.4, clump_db=2.5)
    slide = shifting(coloured(pair(N) * flicks, SLIDE_COLOUR), depth_db=2.5)
    pocket = hollow(flicks, RETURNS, width_hz=360, rise_hz_per_s=650)
    return amp(3.0) * hiss * slide + amp(1.0) * ringing * pocket


def scaling():
    """The edge lifts scale after scale; its flicks crackle, ring the hollow and shake the board."""
    # the fizz comes slightly early; the coarse rasp grows as the arm leans in
    fizz = presses(SCALING, order=2, attack_s=0.063, release_s=.11, lag_s=-0.0029)
    rasp = presses(SCALING, order=3, attack_s=.085, release_s=.11, growth_db_per_s=30)
    shake = presses(SCALING, order=4, attack_s=0.035, release_s=0.12, lag_s=0.0059, growth_db_per_s=23)
    ringing = presses(SCALING, order=5, attack_s=0.096, release_s=0.089, growth_db_per_s=10)
    flicks = catches(rate=650, spread_db=6, life=.0006, rub=.16, clump_db=2)
    crackle = shifting(coloured(pair(N) * flicks, SCALE_COLOUR), depth_db=2.5)
    coarse = filtered(crackle, lambda hz: 1 / (1 + (hz / FIZZ_FROM_HZ) ** 8))
    pocket = hollow(flicks, SCALING, width_hz=216, rise_hz_per_s=980)
    scales = amp(1.0) * fizz * unit(crackle - coarse) + amp(0.5) * rasp * unit(coarse)
    return scales + amp(1.0) * ringing * pocket + shake * rumble(flicks, SCALE_RUMBLE)


def scene():
    """All layers together; the scaling knife works a little to the right of the microphones."""
    knife = scaling() + returns() + squeaks() + snaps()
    # half of the balance goes to each side
    placed = filtered(knife, lambda hz: amp(np.outer([.5, -.5], along(LEFT_OVER_RIGHT, hz))))
    blade = placed + sawing() + cuts()
    blows = board_knocks() + rocks() + table_thuds()
    return blade + blows + handling() + outdoors()


def record(dry):
    """Peaks are cut flat at full scale, then the sound above the upper limit is removed steeply."""
    return filtered(np.clip(dry, -1, 1), lambda hz: 1 / np.sqrt(1 + (hz / TOP_HZ) ** 120))


dry = scene()
out = record(dry)
master(out)
```